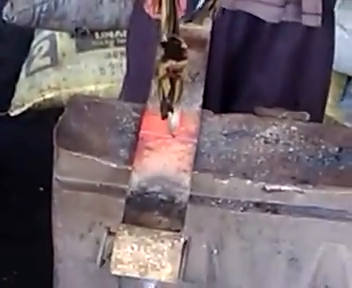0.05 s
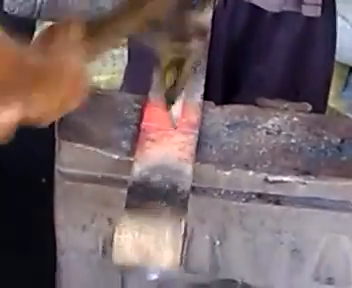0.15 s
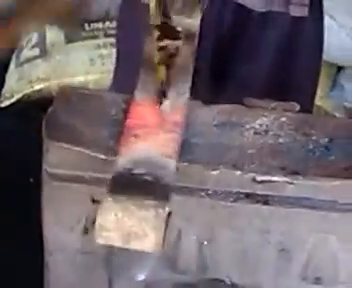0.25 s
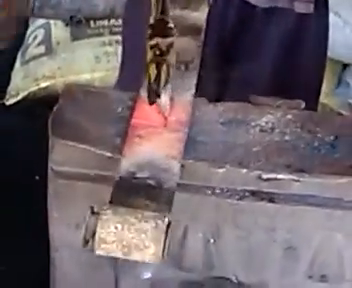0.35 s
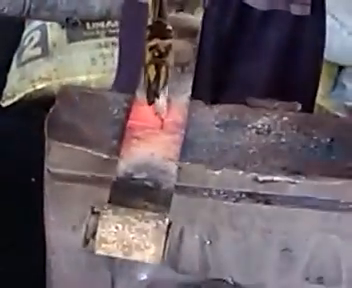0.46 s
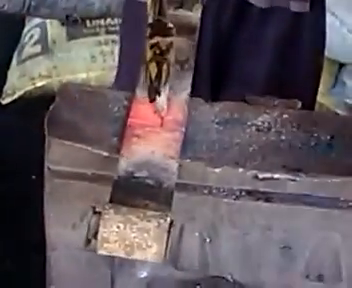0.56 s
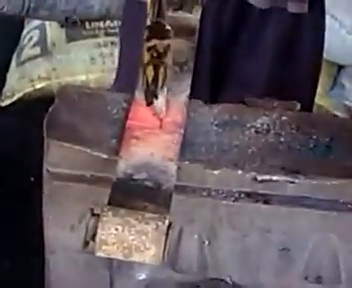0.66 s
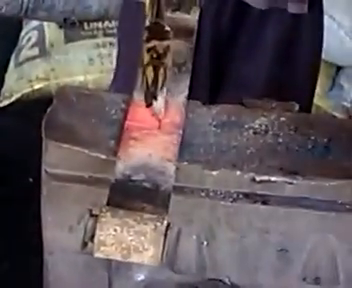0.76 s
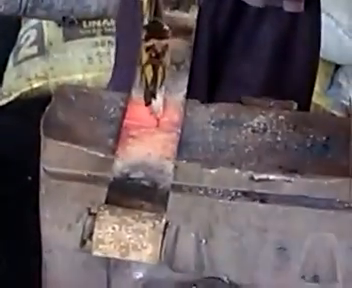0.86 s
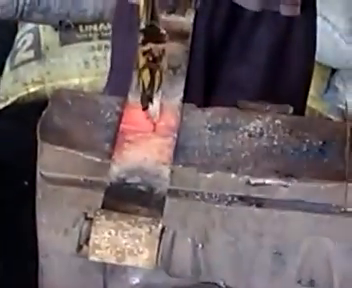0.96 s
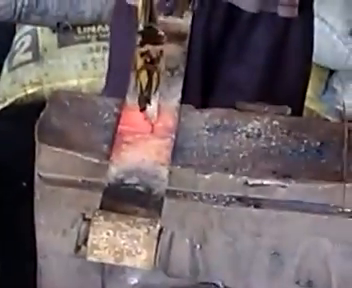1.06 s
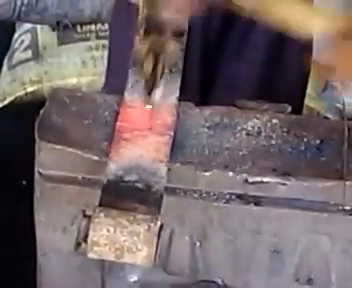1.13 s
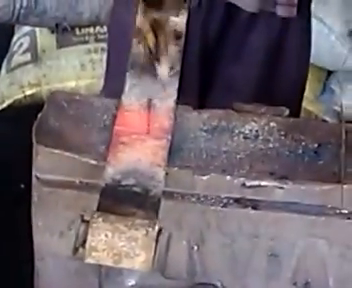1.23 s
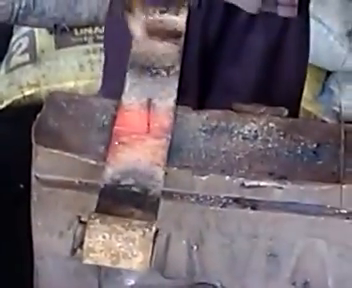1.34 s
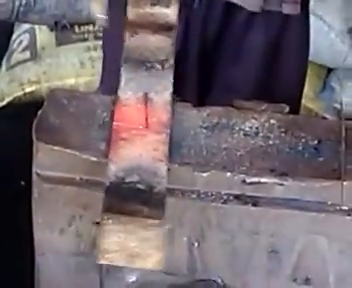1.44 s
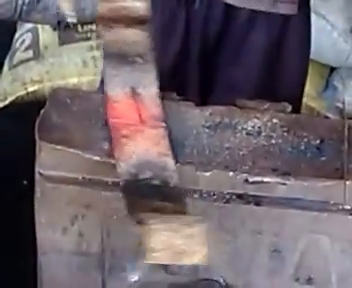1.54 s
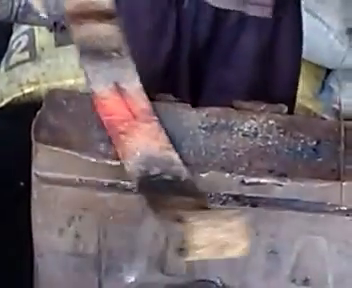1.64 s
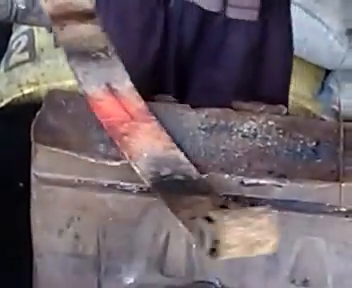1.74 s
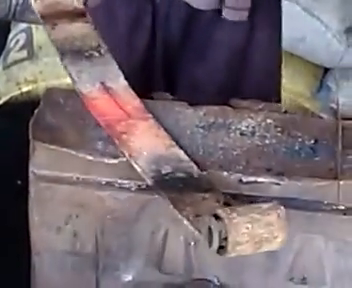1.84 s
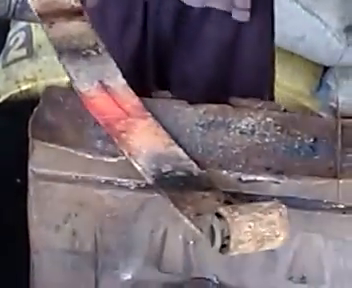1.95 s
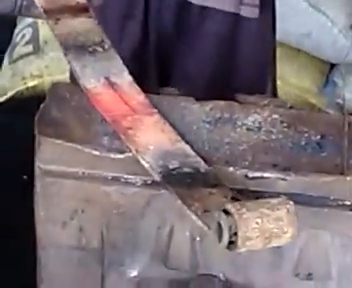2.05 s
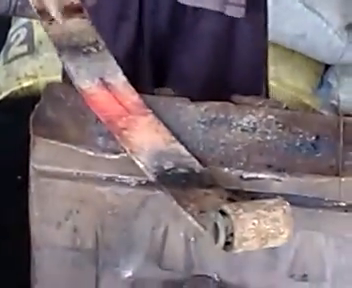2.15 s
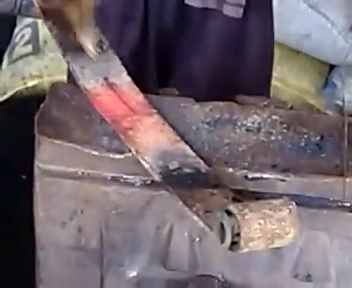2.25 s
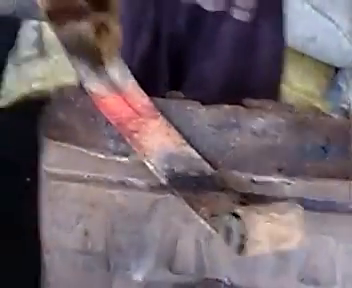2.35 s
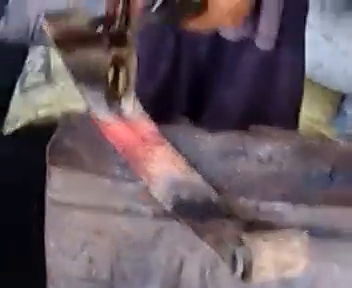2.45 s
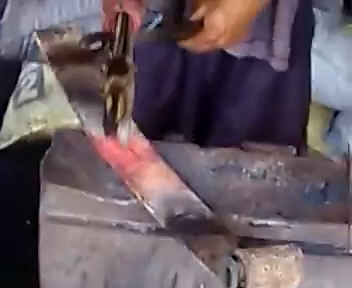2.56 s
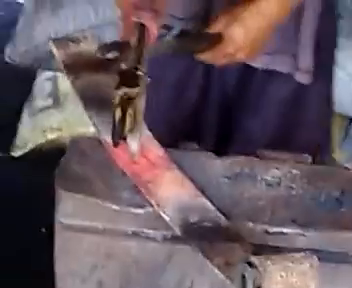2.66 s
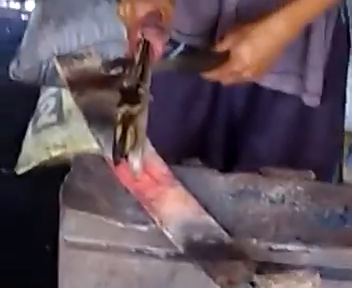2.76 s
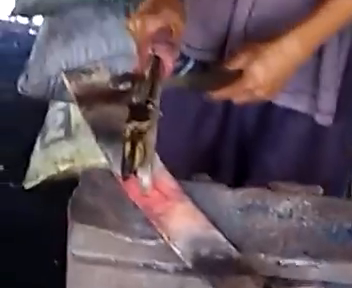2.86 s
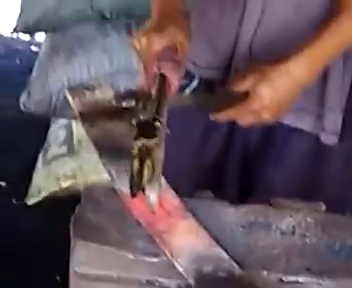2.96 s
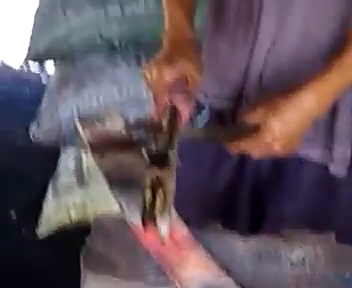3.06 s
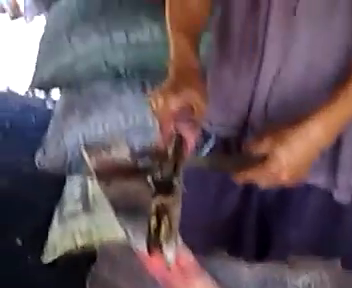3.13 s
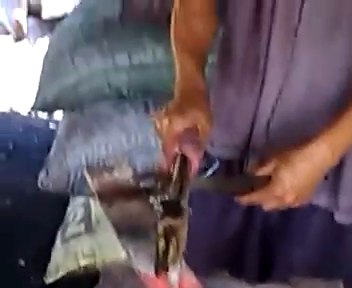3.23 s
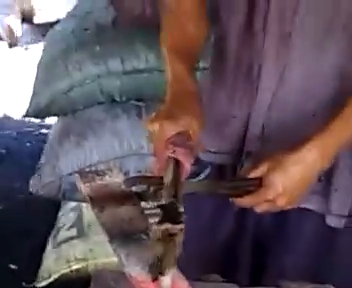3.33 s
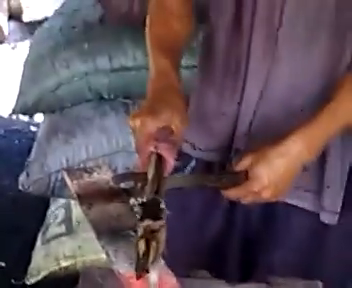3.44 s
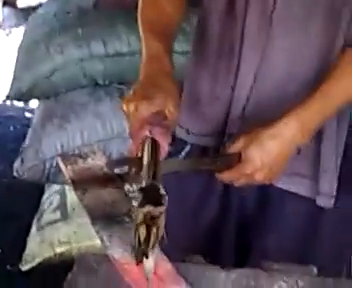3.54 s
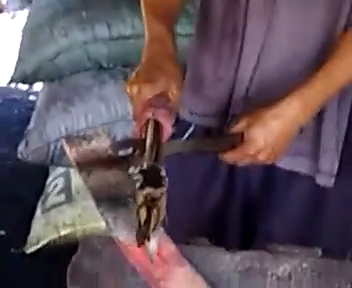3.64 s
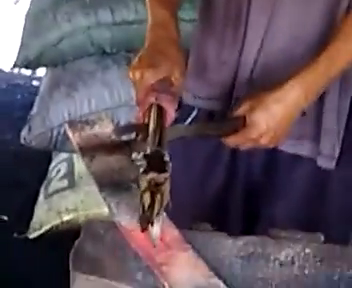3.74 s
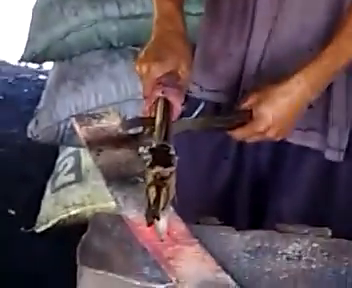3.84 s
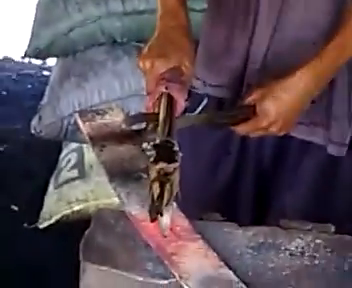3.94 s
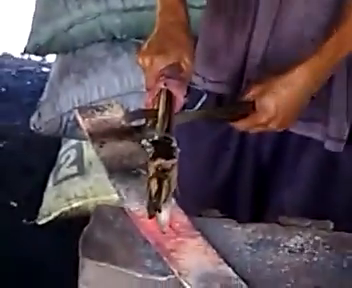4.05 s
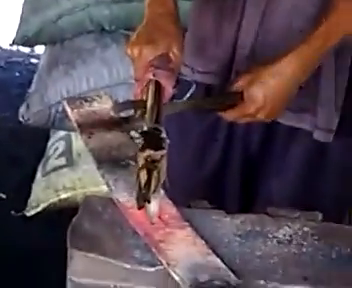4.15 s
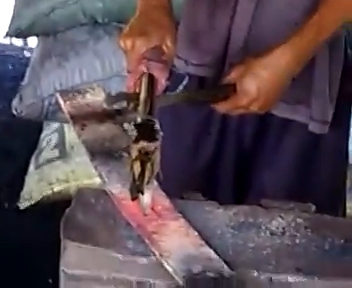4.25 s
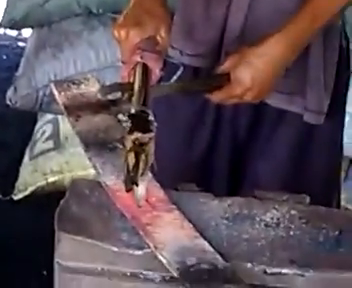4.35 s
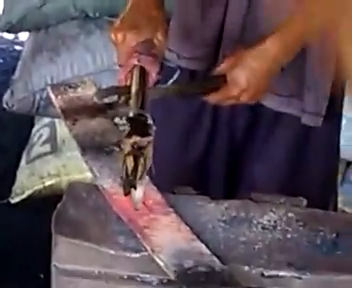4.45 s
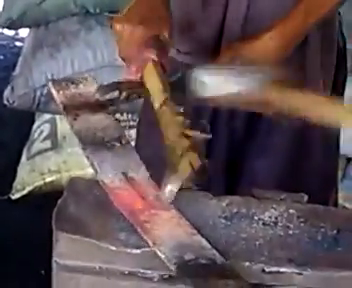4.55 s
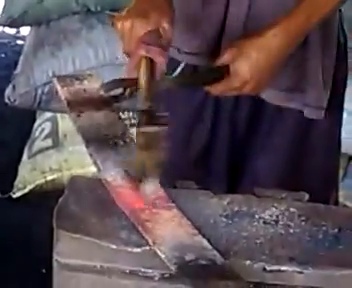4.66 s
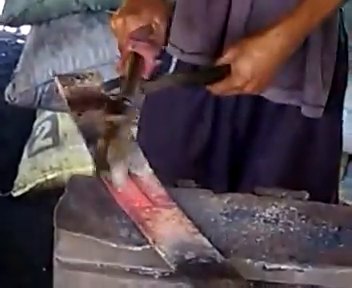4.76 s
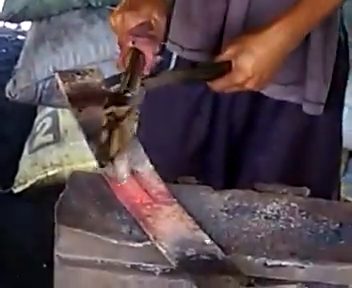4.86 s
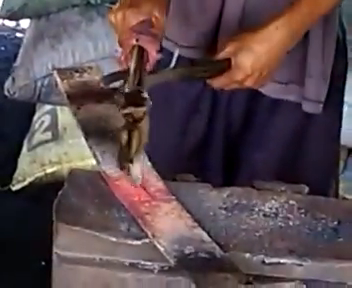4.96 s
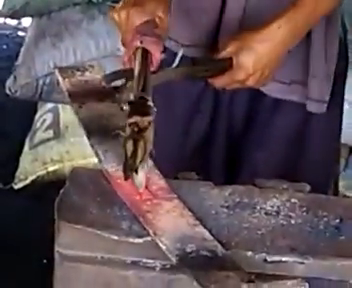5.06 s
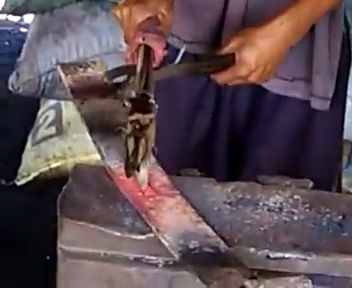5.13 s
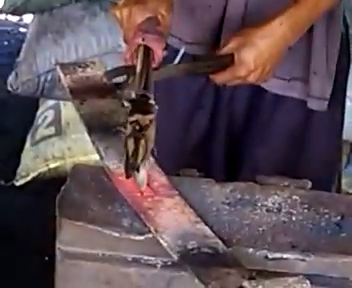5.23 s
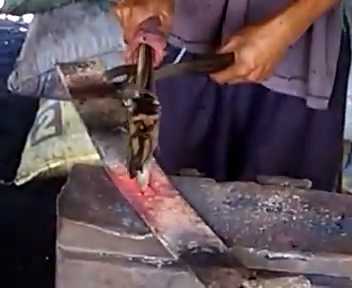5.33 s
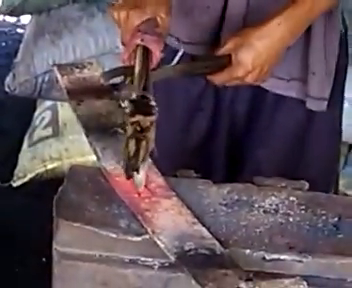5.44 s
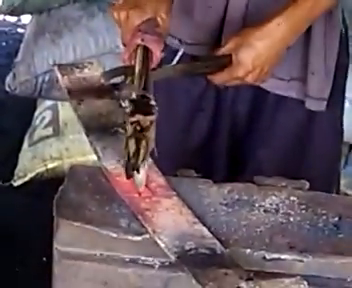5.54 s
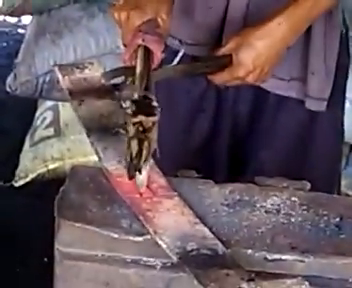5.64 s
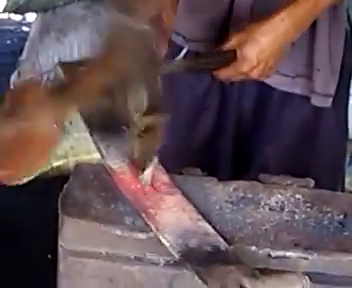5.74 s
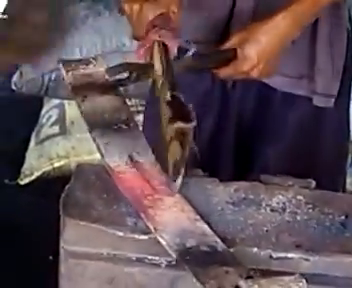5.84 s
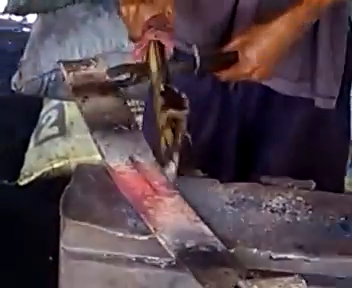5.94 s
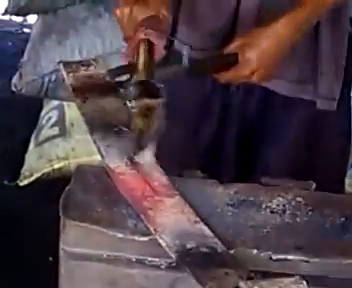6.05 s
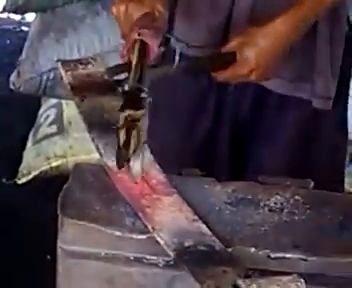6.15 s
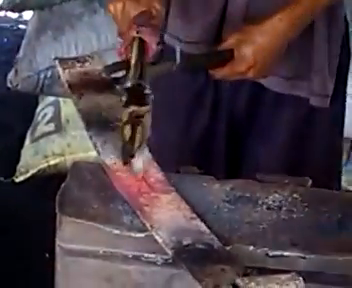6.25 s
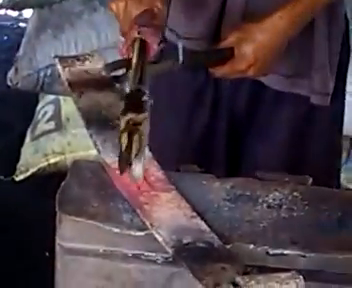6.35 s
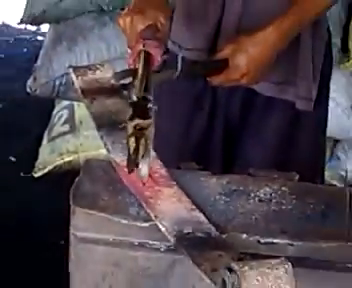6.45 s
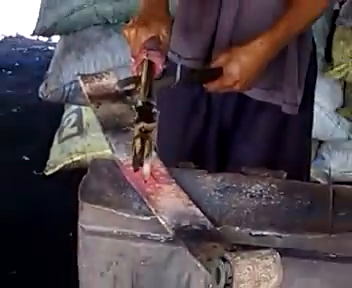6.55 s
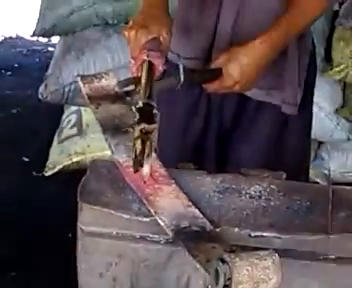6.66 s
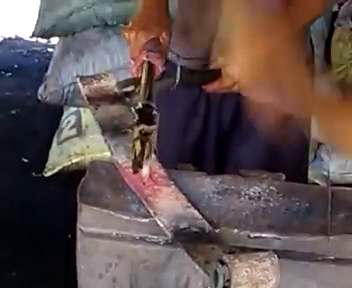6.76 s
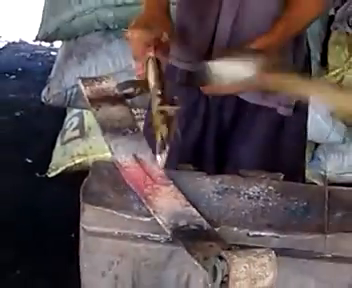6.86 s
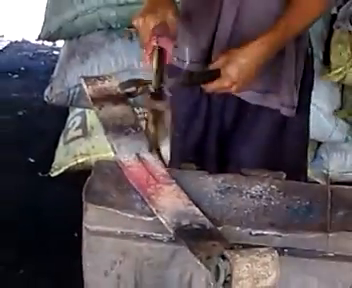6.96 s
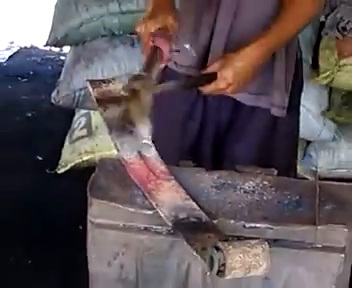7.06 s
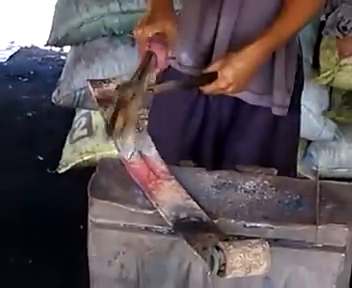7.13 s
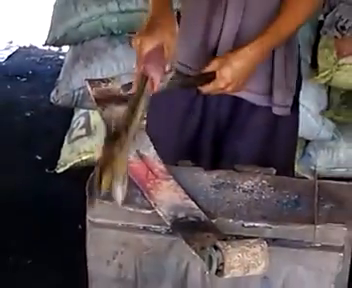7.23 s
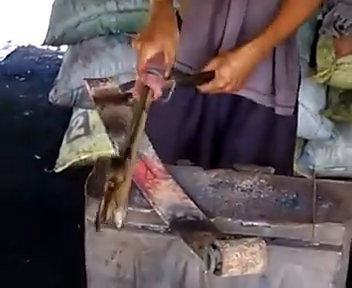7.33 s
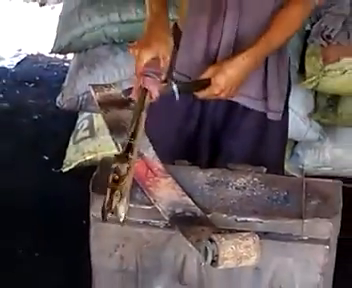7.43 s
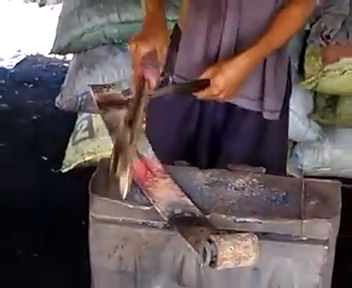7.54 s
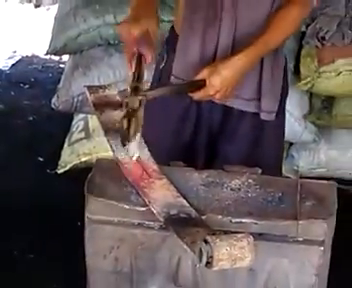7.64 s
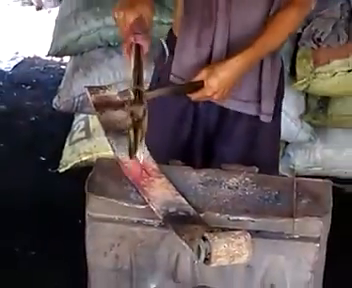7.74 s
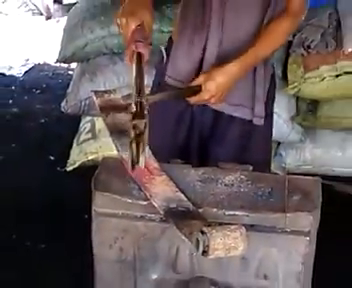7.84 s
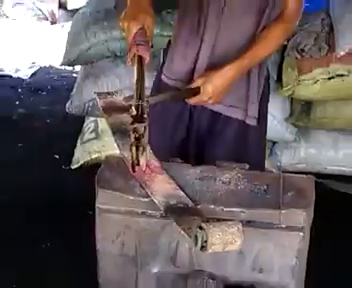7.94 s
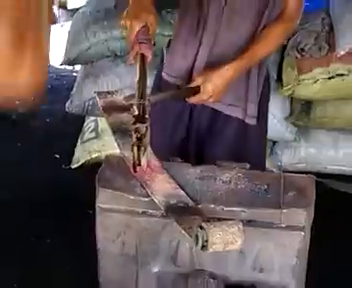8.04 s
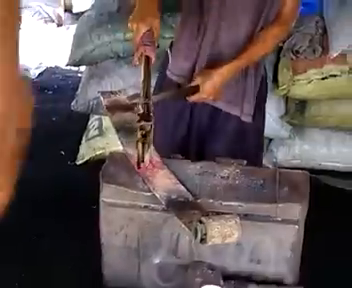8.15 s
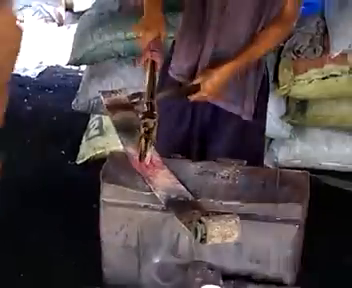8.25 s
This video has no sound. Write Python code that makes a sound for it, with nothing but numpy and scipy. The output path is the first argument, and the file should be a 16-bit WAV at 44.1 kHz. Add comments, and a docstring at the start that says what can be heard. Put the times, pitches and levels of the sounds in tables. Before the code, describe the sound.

Loud, clipped hammer clanks, two early and three after a pause, with light metal taps and scrapes over passing motorbike and swelling truck rumble.

```python
"""A motorbike passes an open village forge as a sledge drives a hand-held chisel into a red-hot steel bar.
Two heavy blows fall early, three more after a pause: noise bursts and damped modes clank, thud and ring.
Scrapes and light taps of the tools, shaped noise and the same modes, come between and after the blows.
A heavier engine, a sum of harmonics, gathers speed throughout over village noise and a fan's wavering sine.
The narrow-band microphone overloads on the blows by clipping."""
import sys
import numpy as np
from scipy import signal
from scipy.fft import irfft
from scipy.io import wavfile
from scipy.ndimage import uniform_filter1d

SR = 44100
rng = np.random.default_rng(int(sys.argv[2]) if len(sys.argv) > 2 else 0)


def generate_wav(sig):
    """Save sig (samples, or channels by samples) to the path in sys.argv[1] as 16-bit PCM at SR."""
    pcm = np.round(np.clip(np.atleast_2d(sig).T, -1, 1) * 32767).astype(np.int16)
    wavfile.write(sys.argv[1], SR, pcm)


N = 365809

# spectrum of the village's hum and of tyre noise: frequency_hz, relative level_db
VILLAGE_SPECTRUM = [(12, -26.5), (24, -8), (55, -4.5), (85, -11), (170, -5), (470, -8), (700, -5.5),
                    (1100, -10), (1650, -9), (1970, -14.5), (2780, -10.5), (3080, -29), (3540, -23.5),
                    (3800, -81)]
# spectrum of a light touch of steel on scale: frequency_hz, relative level_db
TOUCH_SPECTRUM = [(100, -12), (400, -7), (1000, -7.5), (1750, 1), (2500, 0), (2950, 2.5), (3350, -5),
                  (3750, -35)]
# pitches of the two long tones of the steel
LOW_HZ, HIGH_HZ = 2912.6, 3370.8


def undb(db):
    """Amplitude ratio: 20 dB is a factor of ten."""
    return 10 ** (np.asarray(db) / 20)


def unit(x):
    """Normalization: scale to an rms of 1."""
    return x / np.sqrt(np.mean(x ** 2))


def noise(colour, size, tilt_db=0):
    """Spectral shaping: random phases under a (Hz, dB) curve, tilted in dB per octave, rms 1."""
    hz, db = np.transpose(colour)
    bin_hz = np.arange(size // 2 + 1) * SR / size
    octave = np.log2(np.maximum(bin_hz, 1))
    gain = undb(np.interp(octave, np.log2(hz), db + tilt_db * np.log2(hz)))
    phases = np.exp(2j * np.pi * rng.random(len(gain)))
    return unit(irfft(gain * phases, size))


def walk(rate):
    """Slow random modulation: levels held 1 / rate s, smoothed by two moving averages, rms 1."""
    hold = int(SR / rate)
    held = np.repeat(rng.standard_normal(N // hold + 1), hold)
    smoothed = uniform_filter1d(uniform_filter1d(held, hold), hold)
    return unit(smoothed[:N])


def bell(x, centre, width, db):
    """Gaussian weighting: a rounded rise or dip in dB around a centre."""
    return db * np.exp(-((x - centre) / width) ** 2)


def fade(t, t60):
    """Exponential decay: 60 dB down after t60."""
    return np.exp(-np.log(1000) * t / t60)


def ring(t, modes):
    """Modal superposition: damped sines of (Hz, dB, t60) modes at random phases."""
    total = 0
    for hz, db, t60 in modes:
        total = total + undb(db) * fade(t, t60) * np.sin(2 * np.pi * (hz * t + rng.random()))
    return total


def add(out, s, sound):
    """Linear superposition: mix a sound in at time s."""
    start = int(s * SR)
    out[start:start + len(sound)] += sound[:N - start]


def village(waver_db=0.48, wall_db=-17):
    """Comb filtering: far traffic and air, two separately swelling washes of noise, echo off the yard walls."""
    hum_db = -40.5
    lull = (4, 2.4, -1.3)  # between the two vehicles: centre_s, width_s, change_db
    washes = sum(noise(VILLAGE_SPECTRUM, N) * undb(waver_db * walk(rate)) for rate in (3, 12))
    lags = rng.integers(SR // 300, SR // 25, size=6)  # samples
    walls = sum(np.roll(washes, lag) for lag in lags)
    level_db = hum_db + bell(np.arange(N) / SR, *lull)
    return unit(washes + undb(wall_db) * walls) * undb(level_db)


def whine(hz=644, wobble=0.0032, flutter_db=3):
    """Frequency and amplitude modulation: the faint wavering note of a small fan, swelling once."""
    steady_db = -63.5
    swell = (3.7, 1.5, 6.2)  # centre_s, width_s, rise_db
    cycles = np.cumsum(hz * (1 + wobble * walk(5))) / SR
    level_db = steady_db + bell(np.arange(N) / SR, *swell)
    return undb(level_db + flutter_db * walk(2.3)) * np.sin(2 * np.pi * cycles)


def engine(firing_hz, orders, rasp_db=0, boom_db=0, wobble=.004, flutter_db=2):
    """Harmonic series: multiples of the firing rate, each fluttering on its way through the street."""
    cycles = np.cumsum(firing_hz * (1 + wobble * walk(9))) / SR
    total_rms = np.sqrt(sum(undb(db) ** 2 for _, db in orders) / 2)
    out = np.zeros(N)
    for multiple, db in orders:
        beam_db = rasp_db if multiple > 2 else boom_db
        level_db = db + flutter_db * walk(8) + beam_db
        out += undb(level_db) * np.sin(2 * np.pi * (multiple * cycles + rng.random()))
    return out / total_rms


def truck():
    """Harmonic sweep: a heavy engine's firing rate and level climb throughout, over a deep noise rumble."""
    # harmonics of the exhaust: multiple, relative level_db
    truck_orders = [(2, -9), (3, -6.5), (4, -3.5), (5, 2), (6, -1), (8, -7), (11, -16.5), (12, -12)]
    # spectrum of the rumble: frequency_hz, relative level_db
    rumble_spectrum = [(20, -18), (40, -2), (54, -1.5), (80, -11), (160, -28.5), (600, -74)]
    start_hz, rise_hz_per_s, cruise_hz = 28.13, 0.585, 33.55
    cruise_db, growth_db_per_s = -41, 1.95
    rumble_db = -10.5  # against the exhaust
    t = np.arange(N) / SR
    # cruising lies beyond the end of the scene
    to_cruise_s = np.maximum((cruise_hz - start_hz) / rise_hz_per_s - t, 0)
    firing_hz = cruise_hz - rise_hz_per_s * to_cruise_s
    exhaust = engine(firing_hz, truck_orders, wobble=.004, flutter_db=1.7)
    rumble = undb(rumble_db) * noise(rumble_spectrum, N)
    return (exhaust + rumble) * undb(cruise_db - growth_db_per_s * to_cruise_s)


def motorbike(falloff=0.87):
    """Doppler shift, spreading loss and directivity: a pass-by drops in pitch, its rasp yielding to a boom."""
    # harmonics of the exhaust: multiple, relative level_db
    bike_orders = [(1, -8), (2, -1), (3, -3.5), (4, -3), (5, -3.5), (6, -7), (7, -2), (8, -9), (9, -9),
                   (10, -5)]
    rest_firing_hz, exhaust_db, tyres_db = 47.96, -40.5, -45  # levels before beaming, when nearest
    nearest_s, speed_m_s, road_m = 0.85, 16.3, 6.6
    # directivity: bearing from -1 coming to 1 going, width in bearing, change_db
    boom_lobe = (0.46, 0.34, 5)  # the two lowest harmonics, after it passes
    rasp_lobe = (-0.41, 0.24, 10)  # the upper harmonics, as it comes
    rasp_shadow = (0.1, 0.6, -14.5)  # their gap to the side
    leaving_lobe = (0.92, 0.05, 4.2)  # the whole exhaust, further down the road
    along_m = speed_m_s * (np.arange(N) / SR - nearest_s)
    distance_m = np.hypot(along_m, road_m)
    bearing = along_m / distance_m
    doppler = 1 - speed_m_s * bearing / 343  # speed of sound in m/s
    rasp_db = bell(bearing, *rasp_lobe) + bell(bearing, *rasp_shadow)
    boom_db = bell(bearing, *boom_lobe)
    exhaust = engine(rest_firing_hz * doppler, bike_orders, rasp_db, boom_db, wobble=0.0018, flutter_db=3.5)
    beamed = undb(exhaust_db + bell(bearing, *leaving_lobe)) * exhaust
    tyres = undb(tyres_db) * noise(VILLAGE_SPECTRUM, N)
    return (beamed + tyres) * (road_m / distance_m) ** falloff


def scrapes(grit_db=2.0, grain_s=0.0049):
    """Stick-slip friction: the chisel edge catches and slips on flakes of scale."""
    # strokes over the bar: start_s, length_s, level_db
    strokes = [(1.09, 0.16, -41), (5.147, 0.075, -44), (5.279, 0.15, -42), (7.482, .125, -39.5),
               (8.03, 0.1, -43)]
    out = np.zeros(N)
    for s, length_s, db in strokes:
        size, grain = int(length_s * SR), max(int(grain_s * SR), 2)
        catches = np.repeat(undb(grit_db * rng.standard_normal(size // grain + 1)), grain)[:size]
        grit = unit(catches * noise(TOUCH_SPECTRUM, size))
        add(out, s, undb(db) * grit * signal.windows.hann(size))
    return out


def clank(t, parts_db, detune=0.0021):
    """Modal detuning: the stack is pressed together differently each time, which shifts its damped modes."""
    # modes of sledge, chisel, bar and anvil: frequency_hz, relative level_db, t60_s, part that rings
    stack_modes = [(48, -22.5, 0.24, "anvil"), (187.8, -22.5, 0.12, "anvil"), (396, -9, 0.06, "anvil"),
                   (469.7, -8.5, 0.1, "anvil"), (800, -15.5, 0.09, "anvil"), (942, -9, 0.081, "anvil"),
                   (1054, -14, 0.08, "anvil"), (1404, -10.5, 0.14, "bar"), (1616, -13, 0.066, "bar"),
                   (1767, -5, 0.1, "bar"), (1933, -18, 0.26, "chisel"), (2060, -9.5, 0.16, "bar"),
                   (2157, -10, 0.23, "sledge"), (2160, -15.5, .16, "sledge"), (2375, -9.5, 0.24, "sledge"),
                   (2390, -5, 0.19, "sledge"), (2400, -10.5, 0.17, "sledge"), (2400, -1.5, .15, "sledge"),
                   (2494, -8, 0.062, "sledge"), (2520, -6, 0.09, "sledge"), (2560, -10, .14, "chisel"),
                   (2830, -16.5, 0.11, "sledge"), (2820, -2, 0.11, "chisel"), (3136, -7, 0.16, "chisel"),
                   (3292, -12, 0.14, "sledge"), (3680, -10, 0.079, "bar")]
    shifts = 1 + detune * rng.standard_normal(len(stack_modes))
    shifted = []
    for (hz, db, t60, part), shift in zip(stack_modes, shifts):
        shifted.append((hz * shift, db + parts_db.get(part, 0), t60))
    return ring(t, shifted)


def tone(t, hz, t60):
    """Double decay and beating: a lasting mode, with an extra part that is quicker if t60 is long."""
    # the tools still press on the steel and damp the extra part
    pressed_db, pressed_t60 = 0, 0.75
    beat_hz, beat_share = 6.3, 0.14
    beat = 1 + beat_share * np.cos(2 * np.pi * beat_hz * t)
    pressed = undb(pressed_db) * fade(t, pressed_t60) / fade(t, max(t60, pressed_t60))
    return ring(t, [(hz, 0, t60)]) * beat * (1 + pressed)


def taps(tick_db=-2, tick_t60=0.033, clank_db=-12, echo_db=-17, echo_t60=0.16, dull_hz=3100, anvil_db=-14):
    """Contact excitation: light touches stir the modes and low tone; the yard smears them a little."""
    # rebounds and taps: start_s, level_db, low_tone_db, low_tone_t60_s, rise_s (longer sounds softer)
    touches = [(0.389, -33, -51, 0.18, 0.0011), (0.3972, -15.5, -51, .2, 0.0012),
               (0.423, -39, -60, .2, 0.0021), (4.6971, -10.5, -61, .2, 0.0011), (4.723, -20, -60, .2, .001),
               (5.2863, -29.5, -61, .3, 0.00054), (5.344, -44, -66.5, .3, .003),
               (5.382, -34, -57, .3, 0.0025), (6.026, -25.5, -53, 0.32, .0008),
               (6.9920, -17, -56, 0.23, 0.00051), (7.033, -30, -38, 0.22, 0.0026),
               (7.504, -25.5, -43, 0.61, 0.0011), (7.551, -41, -48, .3, .003), (8.062, -43, -64, .3, .008)]
    out, t = np.zeros(N), np.arange(SR) / SR
    dull = signal.butter(6, dull_hz, fs=SR, output="sos")
    for s, db, low_db, low_t60, rise_s in touches:
        tick = undb(tick_db) * fade(t, tick_t60) * noise(TOUCH_SPECTRUM, len(t))
        echo = undb(echo_db) * fade(t, echo_t60) * noise(TOUCH_SPECTRUM, len(t))
        body = undb(clank_db) * clank(t, {"anvil": anvil_db})
        clink = signal.sosfilt(dull, undb(db) * (tick + echo + body))
        low_tone = undb(low_db) * tone(t, LOW_HZ, low_t60)
        add(out, s, (1 - np.exp(-t / rise_s)) * (clink + low_tone))
    return out


def slaps(sound, count=8):
    """Early reflections: ground, posts and walls return delayed copies, weaker the farther they travel."""
    nearest_s, farthest_s, together_db = .012, .042, -13.5
    delays = nearest_s + (farthest_s - nearest_s) * (np.arange(count) + rng.random(count)) / count
    gains = undb(together_db) / delays / np.linalg.norm(1 / delays)
    out = np.zeros(len(sound))
    for s, gain in zip(delays, gains):
        lag = int(s * SR)
        out[lag:] += gain * sound[:len(sound) - lag]
    return out


def blows(crack_db=1, crack_t60=0.017, bite_db=1, thud_db=-12.5, thud_t60=0.12, clank_db=-7.0,
          echo_db=-21.5, rise_s=0.00039, echo_rise_s=0.0048, lumpy_db=3.0):
    """Impact excitation: crack, pitched bite, anvil thud and clank, then two lasting tones and the yard's echo."""
    # sledge blows: start_s, force_db, thud_db, anvil_db, bar_db, chisel_db, sledge_db, low_tone_db,
    # low_tone_t60_s, high_tone_db, echo_db, echo_t60_s, brightness_db_per_octave, bite_pitch_hz, sink_s
    strikes = [(0.3299, -0.5, -5.5, -9, -4.5, -7, -8, -35, 1.33, -40.5, 5.5, 0.24, 4, 2579, 0.0043),
               (1.2950, -3, -3, -3, 0.5, -5.5, -5, -25, 0.88, -29.5, 9.5, 0.24, -4, 2835, 0.0069),
               (4.6820, -3, -3.5, -3, -0.5, -2, -1.5, -37, 1.13, -46.5, 6, 0.23, 0.5, 2353, 0.006),
               (5.922, -2.5, -1, 0.5, -6, -2, -3.5, -20.5, 1.1, -43, 6, 0.26, 3.5, 2457, 0.005),
               (6.969, -2.5, -2.5, 0, -21, -2, -4, -37, 0.9, -38.5, 6, 0.26, 0.5, 2953, .0055)]
    # spectra of the contact, the thud and the yard's echo: frequency_hz, relative level_db
    crack_spectrum = [(300, -35), (1300, -14), (1900, -2.5), (2400, -2), (3000, -4), (3600, -7),
                      (4500, -16)]
    thud_spectrum = [(30, -6), (100, -4.5), (250, -4), (430, -2.5), (900, 5), (1250, -1.5), (2500, -18.5)]
    echo_spectrum = [(100, -6.5), (450, -6.5), (1200, -13), (1800, -1.5), (2350, 1), (2900, 6.5),
                     (3400, -2), (4000, -26.5)]
    high_t60 = 0.79
    out, t = np.zeros(N), np.arange(int(SR * 2)) / SR
    for (s, force_db, weight_db, anvil_db, bar_db, chisel_db, sledge_db, low_db, low_t60, high_db,
         yard_db, yard_t60, bright_db, bite_hz, sink_s) in strikes:
        # full strength while the chisel sinks in, then decay
        crush = fade(np.maximum(t - sink_s, 0), crack_t60)
        crack = undb(crack_db) * crush * noise(crack_spectrum, len(t), bright_db)
        # the chisel springs against the bar, at a pitch that depends on how it is seated
        bite = undb(bite_db) * crush * np.sin(2 * np.pi * bite_hz * t)
        thud = undb(thud_db + weight_db) * fade(t, thud_t60) * noise(thud_spectrum, len(t))
        parts_db = {"anvil": anvil_db, "bar": bar_db, "chisel": chisel_db, "sledge": sledge_db}
        body = undb(clank_db) * clank(t, parts_db)
        # how much the steel sings depends on how squarely it is hit
        low_tone = undb(low_db) * tone(t, LOW_HZ, low_t60)
        high_tone = undb(high_db) * tone(t, HIGH_HZ, high_t60)
        # sacks and clutter scatter the echo back in uneven lumps
        lumps = unit(undb(lumpy_db * walk(250)[:len(t)]))
        echo_envelope = (1 - np.exp(-t / echo_rise_s)) * fade(t, yard_t60)
        echo = undb(echo_db + yard_db) * echo_envelope * lumps * noise(echo_spectrum, len(t))
        impact = undb(force_db) * (crack + bite + thud + body + slaps(crack) + echo)
        # each blow rises over a fraction of a millisecond
        add(out, s, (1 - np.exp(-t / rise_s)) * (impact + low_tone + high_tone))
    return out


def scene():
    """Superposition of sources: the village and road behind, the smithing close by."""
    background = village() + whine() + truck() + motorbike()
    smithing = scrapes() + taps() + blows()
    return (background + smithing)[None]


def record(dry, headroom=0.62):
    """Nonlinear distortion: overload, a narrow band that smooths it, then overshoots clip with a spit of treble."""
    mic_hz, recorder_hz = 3680, 16000  # upper band edges
    full_scale = .71
    overloaded = np.clip(dry, -headroom, headroom)
    narrow = signal.sosfilt(signal.ellip(8, .3, 75, mic_hz, fs=SR, output="sos"), overloaded)
    clipped = np.clip(narrow, -full_scale, full_scale)
    return signal.sosfilt(signal.ellip(8, .2, 70, recorder_hz, fs=SR, output="sos"), clipped)


dry = scene()
out = record(dry)
generate_wav(out)
```